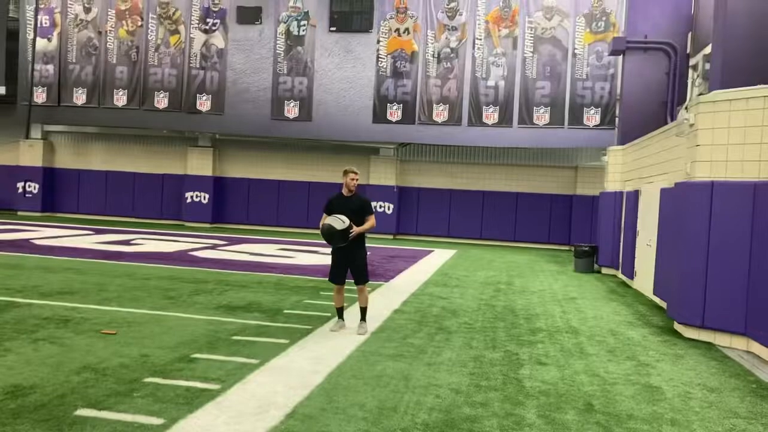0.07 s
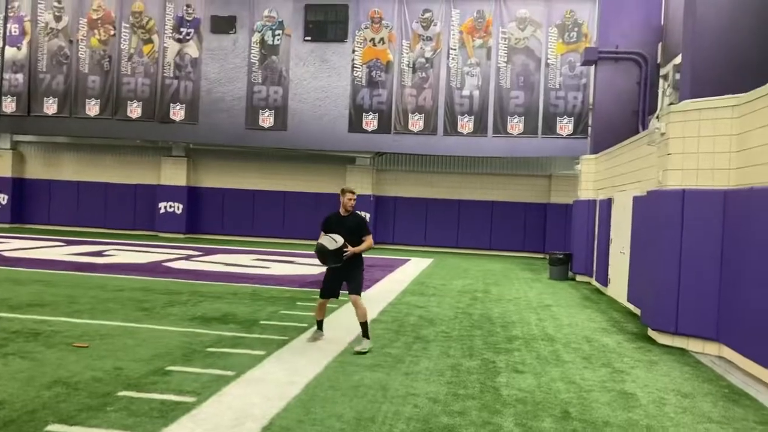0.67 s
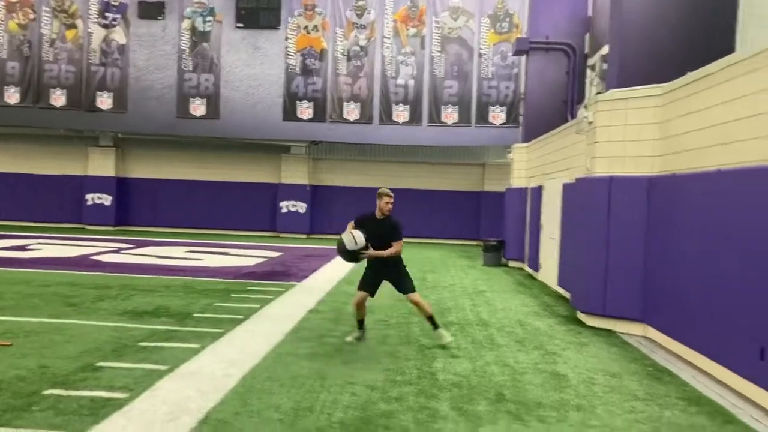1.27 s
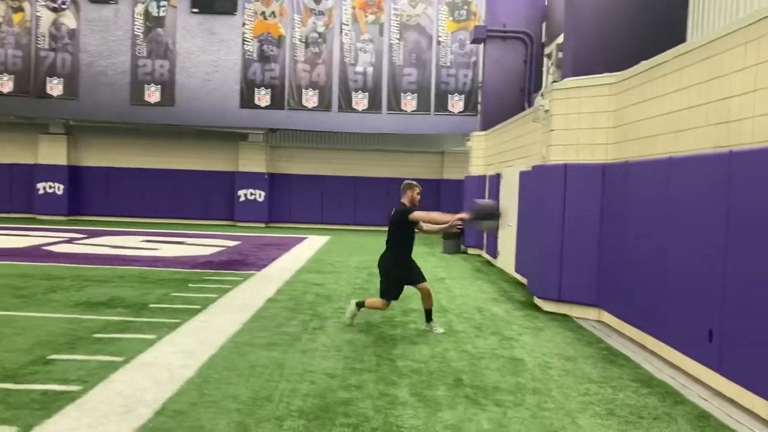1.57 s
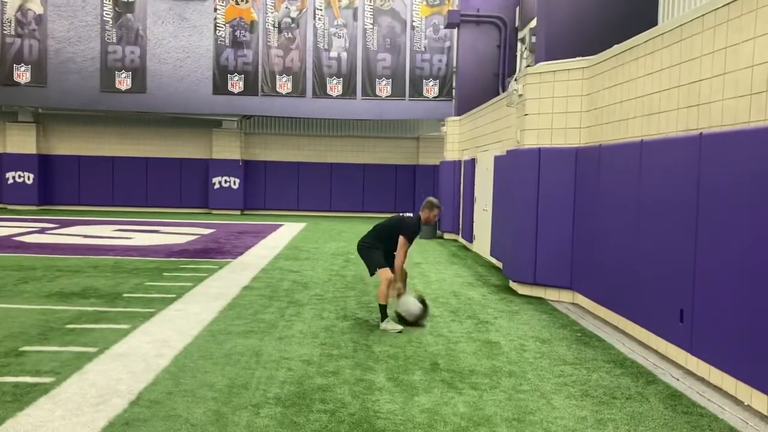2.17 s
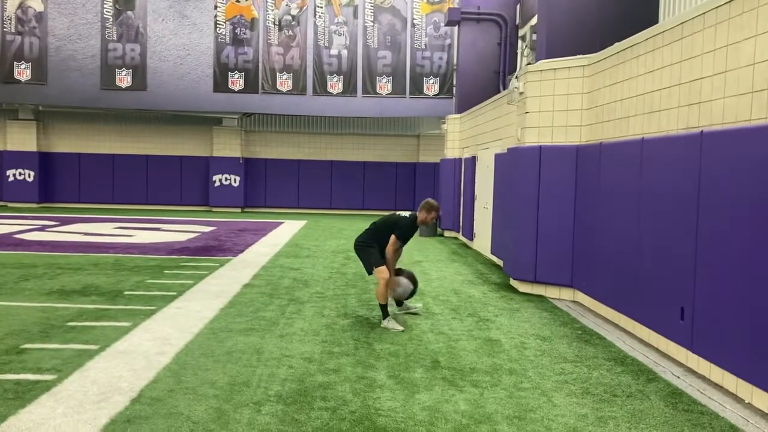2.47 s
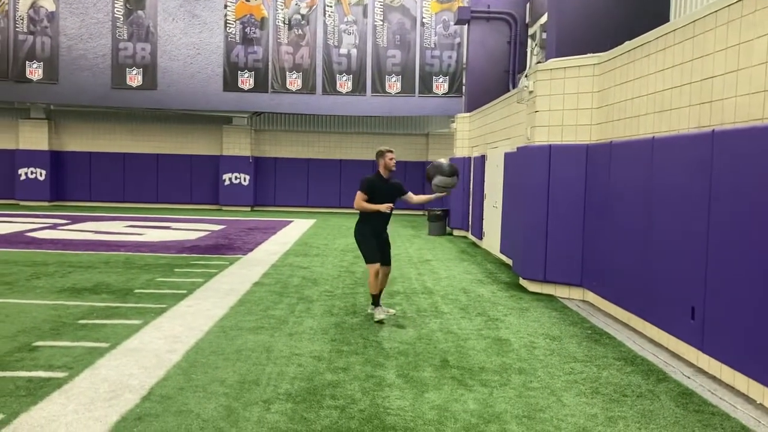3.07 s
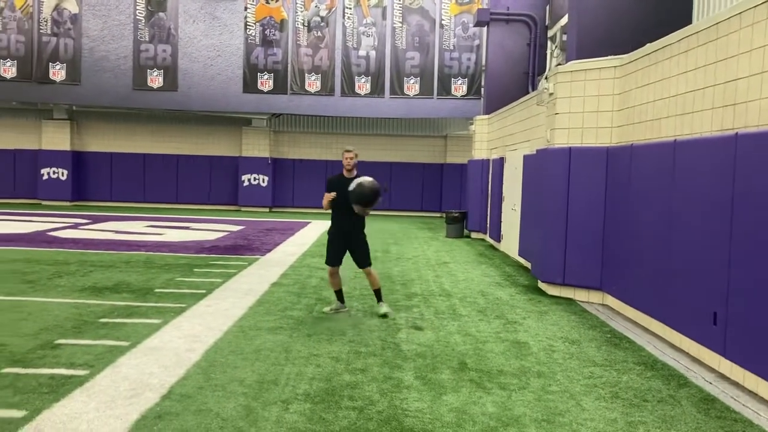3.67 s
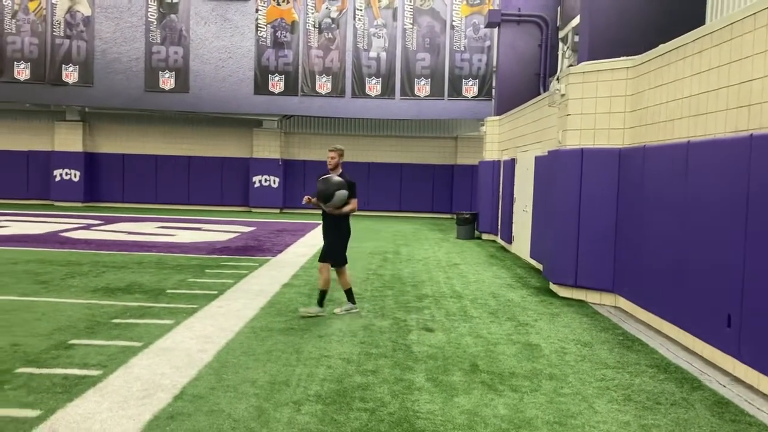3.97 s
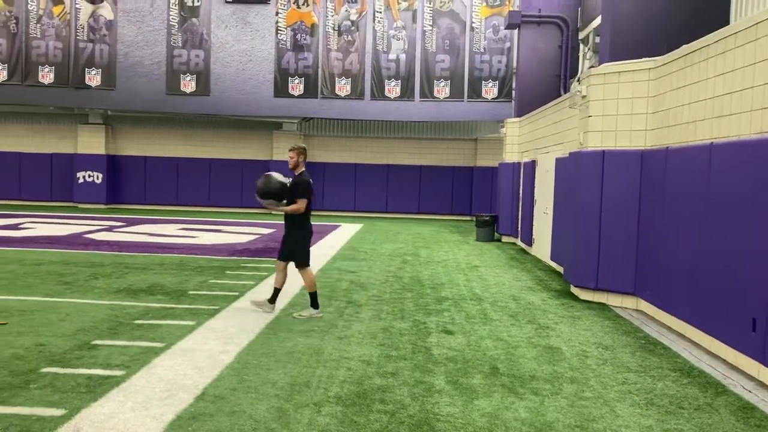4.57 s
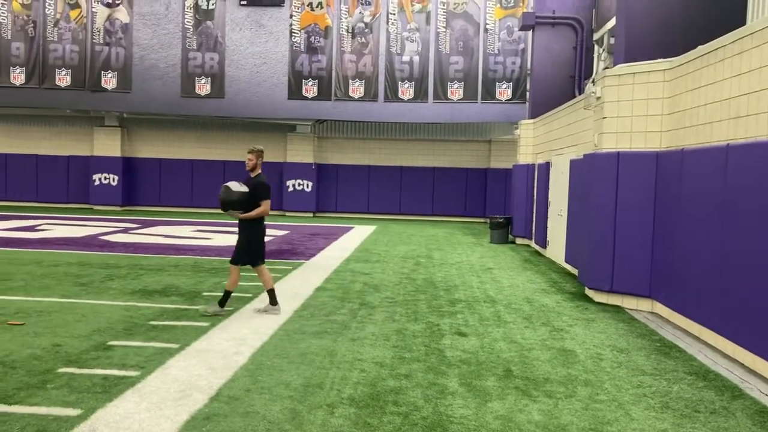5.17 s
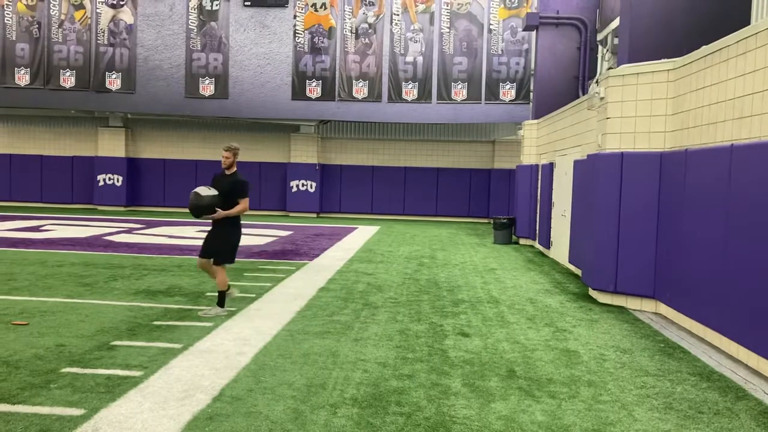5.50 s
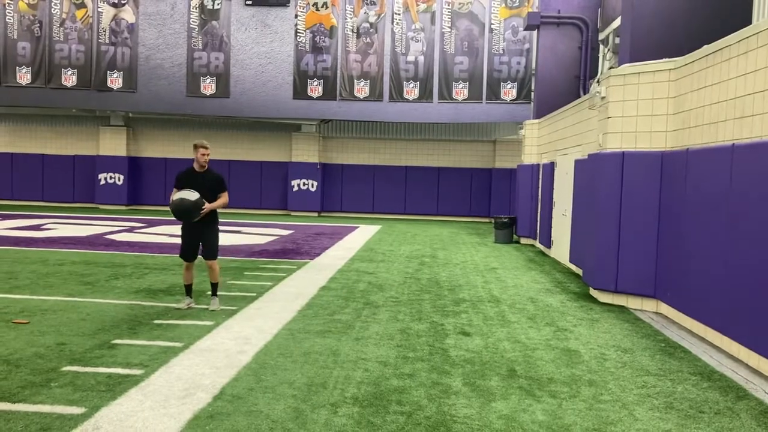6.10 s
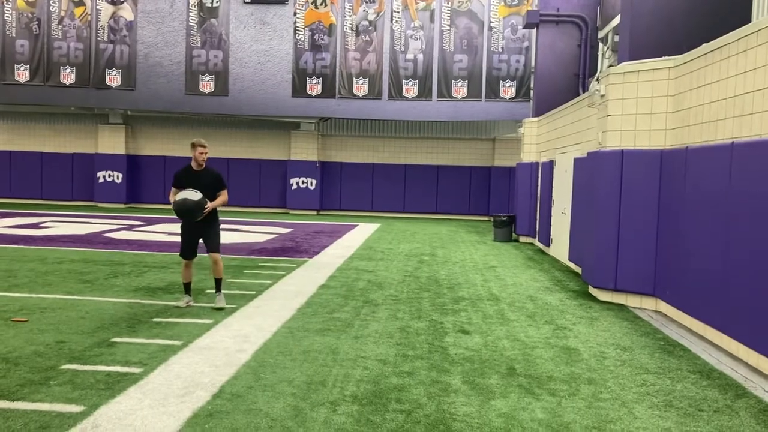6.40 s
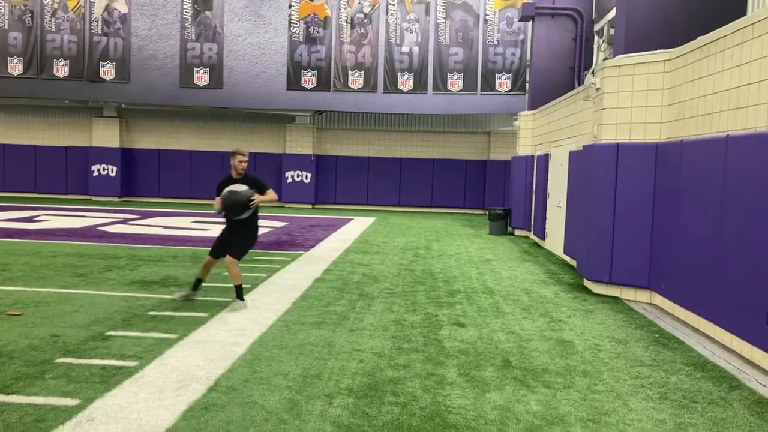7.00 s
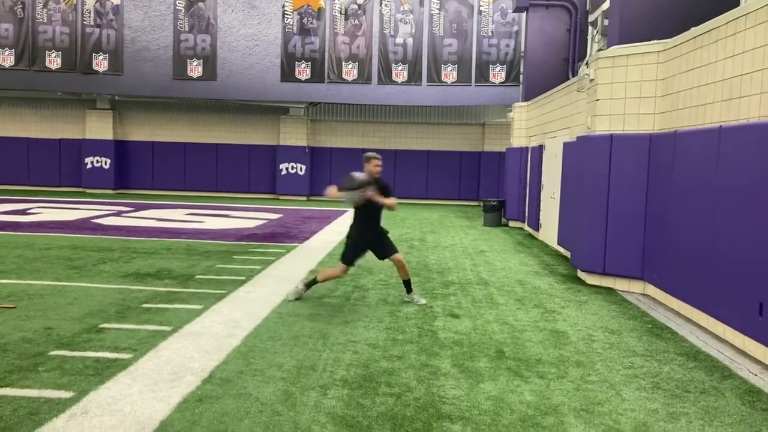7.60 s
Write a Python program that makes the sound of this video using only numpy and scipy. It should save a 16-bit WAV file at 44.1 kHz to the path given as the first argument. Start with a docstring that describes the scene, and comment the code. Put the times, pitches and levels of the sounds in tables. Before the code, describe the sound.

A heavy medicine ball slams into a padded wall in a large echoing hall, then drops onto turf, amid faint shoe scuffs and ventilation rumble.

```python
"""Medicine ball against a padded wall.

In a large hall with artificial turf, the ball's cover slaps, the board behind the pad thuds and
the cushion booms; walls and roof throw all three back. The ball drops, bounces once and is picked
up, squealing faintly in the hands. Shoes brush and stamp over the steady rumble of ventilation."""
import sys
import numpy as np
from scipy import signal
from scipy.fft import rfft, irfft, next_fast_len
from scipy.io import wavfile
from scipy.ndimage import uniform_filter1d

SR = 44100
rng = np.random.default_rng(int(sys.argv[2]) if len(sys.argv) > 2 else 0)


def wav_record(signal):
    """Record a signal, one row per channel, as 16-bit PCM in the file named by sys.argv[1]."""
    frames = np.transpose(np.atleast_2d(signal))
    bounded = np.clip(frames, -1, 1)
    # unit amplitude maps onto the largest positive 16-bit level
    quanta = np.round(bounded * 32767).astype(np.int16)
    wavfile.write(sys.argv[1], SR, quanta)


N = 346185
THROW_S = 1.7243  # ball meets wall
FFT_SIZE = 8192
BINS_HZ = np.fft.rfftfreq(FFT_SIZE, 1 / SR)


def amp(db):
    """Decibels to gain."""
    return 10 ** (np.asarray(db) / 20)


def unit_rms(x):
    """Scales to rms 1."""
    return x / np.sqrt(np.mean(x ** 2) + 1e-20)


def curve(rows, hz=BINS_HZ, column=1):
    """One table column, interpolated over log frequency."""
    columns = np.transpose(rows)
    return np.interp(np.log(hz + 1), np.log(columns[0] + 1), columns[column])


def bells(rows):
    """Bell-shaped lifts and dips, in dB per bin."""
    return sum(db * np.exp(-((BINS_HZ - hz) / width_hz) ** 2) for hz, width_hz, db in rows)


def colour(x, db):
    """Minimum-phase filter with the given gain per bin."""
    log_gain = np.log(amp(np.maximum(db, -100)))
    mirrored = np.concatenate([log_gain, log_gain[-2:0:-1]])
    response = np.exp(np.conj(signal.hilbert(mirrored)))[:len(BINS_HZ)]
    kernel = irfft(response)[:FFT_SIZE // 2].reshape((1,) * (x.ndim - 1) + (-1,))
    return signal.oaconvolve(x, kernel, axes=-1)[..., :x.shape[-1]]


def add(mix, start_s, sound):
    """Mixes a sound in at start_s."""
    part = mix[..., max(round(start_s * SR), 0):][..., :sound.shape[-1]]
    part += sound[..., :part.shape[-1]]


def from_side(x, lag_ms):
    """Off-centre sound reaches one microphone port late: the left for a positive lag."""
    size = next_fast_len(len(x) + FFT_SIZE)
    delay = np.exp(-2j * np.pi * np.fft.rfftfreq(size, 1 / SR) * abs(lag_ms) / 1000)
    late = irfft(rfft(x, size) * delay, size)[:len(x)]
    return np.array([late, x] if lag_ms > 0 else [x, late])


def burst(drive, spectrum_db, length_s):
    """Coloured burst with the energy of rms 1 held for length_s."""
    sound = colour(drive, spectrum_db)
    energy = np.sum(np.atleast_2d(sound) ** 2, 1).mean()
    return sound / np.sqrt(energy / (length_s * SR))


def rattle(envelope):
    """Dense tiny impacts under an envelope; near-flat spectrum, unit energy."""
    x = rng.standard_normal(len(envelope)) * envelope
    for _ in range(8):  # whiten, then restore the envelope
        x = irfft(np.exp(1j * np.angle(rfft(x))), len(x))
        x = x * envelope / np.sqrt(np.abs(uniform_filter1d(x ** 2, size=32)) + 1e-12)
    return x / np.linalg.norm(x)


# Diffuse field. Each row: frequency in Hz, left-right correlation.
COHERENCE = [(60, 0.98), (130, 0.9), (290, 0.83), (640, -0.011), (1400, -0.27), (3000, -0.042),
             (7000, -0.05), (15000, -0.034)]

def diffuse(size):
    """White noise from all sides: alike at both ports in the bass, unrelated in the treble."""
    length = next_fast_len(size)
    mid, side = rfft(rng.standard_normal((2, length)))
    coherence = np.clip(curve(COHERENCE, np.fft.rfftfreq(length, 1 / SR)), -1, 1)
    mid = mid * np.sqrt((1 + coherence) / 2)
    side = side * np.sqrt((1 - coherence) / 2)
    return irfft(np.array([mid + side, mid - side]), length)[:, :size]


# Air noise. Each row: frequency in Hz, relative density in dB.
AIR_SPECTRUM = [(20, -20), (30, -15), (52, 1.5), (120, -3), (200, -17), (450, -20.5), (750, -21.5),
                (1500, -26), (3000, -30.5), (5500, -38.5), (9000, -41), (11500, -52.5), (13500, -54.5),
                (16000, -59.5)]
# Duct resonances. Each row: centre in Hz, width in Hz, lift in dB.
DUCT_MODES = [(248.9, 16, 6.6), (345.2, 52, 4), (576.6, 24, 1.7)]

def ventilation(db):
    """Moving air rumbles and hisses through resonant ducts."""
    return amp(db) * unit_rms(colour(diffuse(N), curve(AIR_SPECTRUM) + bells(DUCT_MODES)))


def reverb_tail(bands, delay_s, rise_s, clump_db):
    """Reflections arrive in uneven clumps; each band dies at its own rate."""
    hz, t, noise = signal.stft(diffuse(2 * SR), SR, nperseg=512)
    t60_s = np.maximum(curve(bands, hz, column=2), .05)[:, None]
    gain = amp(curve(bands, hz))[:, None] * np.sqrt(np.log(1e6) / (t60_s * SR))
    clumps = unit_rms(uniform_filter1d(rng.standard_normal(noise.shape[1:]), size=24, axis=0))
    decay = np.exp(-np.log(1000) * t / t60_s)
    tail = signal.istft(noise * unit_rms(amp(clump_db * clumps)) * gain * decay, SR, nperseg=512)[1]
    tail *= 1 - np.exp(-np.arange(tail.shape[1]) / SR / rise_s)
    return np.pad(tail, ((0, 0), (round(delay_s * SR), 0)))


# Early and late reverberation. Each row: frequency in Hz, gain in dB, T60 in seconds.
EARLY_BANDS = [(60, -24, .8), (149, -12.5, .45), (400, -7, .2), (1200, -7.5, .62), (3500, -5.5, .85),
               (7000, -18, 0.29), (11000, -11, 0.81), (16000, -20.5, .35)]
LATE_BANDS = [(60, -10.5, 2.8), (150, -21, 1.91), (400, -15.5, 2.3), (1200, -14, 3.4), (2920, -10.5, 4.2),
              (7000, -18, 2.5), (11000, -30.5, .9), (16000, -36, .65)]

def hall(x):
    """The near wall and roof answer first, then the whole hall rings."""
    response = np.zeros((2, 2 * SR))
    add(response, 0, reverb_tail(EARLY_BANDS, delay_s=.038, rise_s=.004, clump_db=4))
    add(response, 0, reverb_tail(LATE_BANDS, delay_s=.015, rise_s=.06, clump_db=2))
    return signal.fftconvolve(x[None], response, axes=1)[:, :N]


def click(start_s, db, fall_s):
    """One faint, sharp click: a step that sinks back."""
    out = np.zeros(N)
    add(out, start_s, -amp(db) * np.exp(-np.arange(SR // 50) / SR / fall_s))
    return out


# Dry ticks. Each row: start in seconds, level in dB.
TURF_TICKS = [(3.4616, -51), (4.569, -49), (5.3403, -52), (7.038, -53.5), (7.711, -50)]
# Their spectrum. Each row: frequency in Hz, relative density in dB.
TICK_SPECTRUM = [(300, -4), (1200, 4), (4000, -8), (8000, 5), (15000, -10)]

def ticks(fall_s=.0012):
    """Tiny snaps of turf and shoe."""
    out, t = np.zeros((2, N)), np.arange(SR // 40) / SR
    for start_s, db in TURF_TICKS:
        snap = diffuse(len(t)) * np.exp(-t / fall_s)
        add(out, start_s, amp(db) * burst(snap, curve(TICK_SPECTRUM), fall_s))
    return out


def sole_pressure(t, rise_s, fall_s):
    """The load on a sole builds to 1 at t = 0, then eases."""
    return 1 / np.cosh(np.clip(t / np.where(t < 0, rise_s, fall_s), -20, 20))


def add_stroke(envelopes, peak_s, db, rise_s, fall_s, rasp_db):
    """Adds one shoe stroke to the brush and rasp envelopes; the rasp needs more pressure."""
    pressure = sole_pressure(np.arange(-SR // 2, SR // 2) / SR, rise_s, fall_s)
    add(envelopes, peak_s - .5, amp(db) * np.array([pressure, amp(rasp_db) * pressure ** 2.6]))


# Run-ups. Each row: skip time, slide length and pivot time in seconds, effort in dB.
RUN_UPS = [(.966, .085, 1.505, 0), (7.051, 0.049, 7.636, 1.5)]
# Light steps. Each row: peak time in seconds, brush level in dB, half length in seconds.
LIGHT_STEPS = [(1.24, -76, 0.013), (1.58, -60.5, 0.016), (1.668, -61, .008), (3.142, -70, 0.015),
               (3.464, -66.5, .018), (4.58, -67.5, .035), (4.83, -74.5, 0.039), (5.147, -73.5, 0.049),
               (5.66, -73, .05), (6.024, -73, .025), (7.261, -67, 0.016)]

def footwork(drag_after_s=.17, lift_s=2.72):
    """Brush and rasp envelopes: skips, pivots, toe drags, steps and a shift as the ball is lifted."""
    envelopes = np.zeros((2, N))
    for skip_s, slide_s, pivot_s, effort_db in RUN_UPS:
        add_stroke(envelopes, skip_s, db=effort_db - 56.5, rise_s=.02, fall_s=slide_s, rasp_db=2)
        add_stroke(envelopes, pivot_s, db=effort_db - 56.5, rise_s=.036, fall_s=.016, rasp_db=10)
        add_stroke(envelopes, pivot_s + drag_after_s, db=-64, rise_s=.034, fall_s=.06, rasp_db=3.5)
    for peak_s, db, half_s in LIGHT_STEPS:  # quick bite, slow slide out
        add_stroke(envelopes, peak_s, db, rise_s=.65 * half_s, fall_s=1.25 * half_s, rasp_db=4)
    add_stroke(envelopes, lift_s, db=-72, rise_s=.12, fall_s=.34, rasp_db=16)
    return envelopes


# Turf blades and rubber crumb. Each row: frequency in Hz, relative density in dB.
BLADE_SPECTRUM = [(300, -31), (1500, -7), (4200, -6.5), (5800, -4), (7300, 3), (11000, 2), (15500, -7)]
CRUMB_SPECTRUM = [(100, -27), (350, -3.5), (750, -5), (1050, -1), (1400, 4.5), (1950, -8.5), (2400, -8),
                  (3000, -14), (4500, -21), (9000, -33.5)]

def scuffs(flicks_per_s=12000):
    """Plastic blades flick past the sole; under weight the rubber crumb rasps too."""
    brush, rasp = footwork()
    strengths = amp(1.8 * np.minimum(rng.exponential(1, N), 5))
    flicks = strengths * (rng.random(N) < flicks_per_s / SR)
    blades = unit_rms(colour(diffuse(N) * flicks, curve(BLADE_SPECTRUM)))
    crumb = unit_rms(colour(diffuse(N), curve(CRUMB_SPECTRUM)))
    return brush * blades + rasp * crumb


def add_knock(mix, centre_s, db, width_s):
    """Adds one dull push with no ring."""
    lead_s = .01
    u = (np.arange(SR // 50) / SR - lead_s) / width_s
    add(mix, centre_s - lead_s, amp(db) * (2 * u ** 2 - 1) * np.exp(-u ** 2))


def boom(db, start_hz, length_s, sag_s=.14, rise_s=.009):
    """A cushion swings a few times; its pitch sags as more mass joins in."""
    t = np.arange(SR // 5) / SR
    cycles = start_hz * sag_s * (1 - np.exp(-t / sag_s))
    envelope = (1 - np.exp(-(t / rise_s) ** 2)) * np.exp(-(t / length_s) ** 3)
    return amp(db) * np.sqrt(2) * np.sin(2 * np.pi * cycles) * envelope


# Foot plants. Each row: heel time in seconds, crunch level in dB, rise and fall in seconds,
# sole time in seconds, sole level in dB.
FOOT_PLANTS = [(1.607, -43.5, .024, .009, 1.612, -46), (7.7157, -42.5, 0.0033, 0.016, 7.746, -39.5)]
# Heel crunch. Each row: frequency in Hz, relative density in dB.
HEEL_SPECTRUM = [(60, -12.5), (190, 5.5), (320, -2.5), (480, -.5), (680, -6.5), (1100, -12.5),
                 (2000, -24.5), (6000, -38.5)]

def stamps():
    """The front heel crunches and knocks into the turf, then the sole thumps down."""
    out, t = np.zeros((2, N)), np.arange(-SR // 4, SR // 4) / SR
    for heel_s, db, rise_s, fall_s, sole_s, sole_db in FOOT_PLANTS:
        crunch = unit_rms(colour(diffuse(len(t)), curve(HEEL_SPECTRUM)))
        add(out, heel_s + t[0], amp(db) * sole_pressure(t, rise_s, fall_s) * crunch)
        add_knock(out, heel_s, db + 6, width_s=.0013)
        add(out, sole_s, boom(sole_db, start_hz=85, length_s=.043))
    return out


# Ball cover. Each row: frequency in Hz, relative density in dB.
SLAP_SPECTRUM = [(150, -34), (400, -25), (620, -19), (800, -7.5), (1080, -7.5), (1650, -7), (2100, -11),
                 (3300, -13.5), (4300, -11), (5500, -10), (7500, -8.5), (11000, -15.5), (15500, -20)]

def slap(db, contact_s, spread):
    """The cover flattens in a few quick snaps, ever wider apart; the filling hisses as it settles."""
    t = np.arange(SR // 5) / SR
    snap_phase = (t / (.17 * contact_s)) ** .85 % 1
    contact = np.exp(-(t / contact_s) ** 4) * (.3 + np.exp(-snap_phase / .4))
    low_cut_db = -10 * np.log10(1 + (900 / (BINS_HZ + 1)) ** 2)
    scattered = colour(np.array([rattle(contact), rattle(contact)]), low_cut_db)
    hiss = .27 * rattle(np.exp(-t / .04))
    direct = from_side(rattle(contact) + hiss, lag_ms=.09)
    return amp(db) * burst(direct + spread * scattered, curve(SLAP_SPECTRUM), contact_s)


# Body of an impact. Each row: frequency in Hz, relative density in dB.
THUD_SPECTRUM = [(25, -45), (100, -9), (160, 9.5), (230, 4), (300, -4), (400, -1.5), (600, -4),
                 (900, -12.5), (1400, -27.5), (3000, -50)]

def thud(db, travel_s):
    """Low bending waves travel slowest (travel_s at 400 Hz), so the thud falls in pitch."""
    lag_cycles = 2 * travel_s * np.sqrt(400 * np.fft.rfftfreq(SR // 5, 1 / SR))
    chirp = irfft(np.exp(-2j * np.pi * lag_cycles), SR // 5)
    return amp(db) * burst(chirp, curve(THUD_SPECTRUM), length_s=.014)


# Slips. Each row: start and length in seconds, start and end pitch in Hz, level in dB before gain_db.
COVER_SLIPS = [(2.625, .13, 1490, 1502, -62), (2.68, .2, 1684, 1622, -63), (2.77, 0.1, 1490, 1430, -59.5),
               (2.86, 0.15, 1600, 1584, -62), (2.989, 0.1, 1600, 1627, -61),
               (3.203, .075, 1535, 1535, -61.5), (3.287, .085, 1660, 1610, -66.5)]

def squeals(gain_db, waver_hz=42):
    """The cover squeals faintly as it slips through the hands."""
    out = np.zeros((2, N))
    for start_s, length_s, start_hz, end_hz, db in COVER_SLIPS:
        progress = np.arange(0, 1, 1 / (length_s * SR))
        waver = unit_rms(uniform_filter1d(rng.standard_normal(SR // 2), size=300))[:len(progress)]
        pitch_hz = start_hz + (end_hz - start_hz) * progress + waver_hz * waver
        tone = np.sqrt(2) * np.sin(2 * np.pi * np.cumsum(pitch_hz) / SR)
        add(out, start_s, from_side(amp(db + gain_db) * np.sin(np.pi * progress) * tone, lag_ms=.095))
    return out


# Grips and catches. Each row: start in seconds, gain in dB.
PALM_PATS = [(2.655, -60), (2.695, -55.5), (2.8, -57), (3.145, -60), (3.232, -56.5)]

def pats():
    """The palms catch the ball with a hollow pat."""
    out = np.zeros((2, N))
    hollow_db = bells([(1040, 670, 19.3)])
    for start_s, gain_db in PALM_PATS:
        pat = slap(db=-12.5, contact_s=.018, spread=1.3) + thud(db=-8, travel_s=.00297)
        add(out, start_s, amp(gain_db) * colour(pat, hollow_db))
    return out


# Drop and bounce. Each row: start in seconds, slap level in dB before the mid lift,
# contact in seconds, boom level in dB, boom start pitch in Hz.
BALL_LANDINGS = [(2.153, -41.5, .018, -25.5, 44), (2.257, -39, .011, -37.5, 117)]
# Filling slumps. Each row: centre in seconds, level in dB, width in seconds.
FILLING_KNOCKS = [(2.1597, -20, .0014), (2.165, -27, 0.0008), (2.1811, -23.5, 0.0022),
                  (2.1837, -23.5, 0.0011), (2.263, -25.5, 0.0014), (2.269, -26.5, 0.00217),
                  (2.286, -28.5, 0.0022)]
# Filling settles. Each row: start in seconds, level in dB, swell in seconds.
FILLING_CRUNCHES = [(2.172, -42.5, .009), (2.268, -45, .005)]
# Its crunch. Each row: frequency in Hz, relative density in dB.
FILLING_SPECTRUM = [(80, -8), (200, 3), (500, -2.5), (1000, -6), (1500, -12), (3000, -24), (8000, -25)]

def ball_drop():
    """The cover lands on the turf; the loose filling follows in dull knocks and crunches to rest."""
    out, t = np.zeros((2, N)), np.arange(SR // 5) / SR
    mid_lift_db = bells([(700, 530, 5.3)])
    for start_s, slap_db, contact_s, boom_db, boom_hz in BALL_LANDINGS:
        cover = colour(slap(slap_db, contact_s, spread=.95), mid_lift_db)
        add(out, start_s, cover - boom(boom_db, boom_hz, length_s=.048))
    for centre_s, db, width_s in FILLING_KNOCKS:
        add_knock(out, centre_s, db, width_s)
    for start_s, db, swell_s in FILLING_CRUNCHES:
        grains = diffuse(len(t)) * t / swell_s * np.exp(-t / swell_s)
        add(out, start_s, amp(db) * burst(grains, curve(FILLING_SPECTRUM), 3 * swell_s))
    return out


# Thud off the floor and near walls; boom off the roof and far walls.
# Each row: delay in seconds, gain in dB.
NEAR_RETURNS = [(.0155, -10), (.033, -17), (.047, -17.5), (.062, -17), (.081, -17.5), (.128, -23.5),
                (.151, -25), (.181, -27)]
FAR_RETURNS = [(0.095, -16), (0.125, -14.2), (0.1378, -21), (0.1764, -22), (.215, -25), (0.2506, -29),
               (.317, -18), (.3451, -12.5), (.3909, -23.5), (.4748, -21.5), (.5293, -24.8), (0.5853, -22.5),
               (.62, -26.5), (.7252, -27.6), (.7546, -27.5), (.834, -28.5)]

def low_echoes(direct, hit):
    """Near surfaces return the thud in quick succession; far ones keep the boom rolling."""
    out = np.zeros(N)
    body = signal.sosfilt(signal.butter(2, [115, 620], "band", fs=SR, output="sos"), direct)
    bass = signal.sosfilt(signal.butter(2, 95, fs=SR, output="sos"), hit)
    for band, returns in [(body, NEAR_RETURNS), (bass, FAR_RETURNS)]:
        for delay_s, db in returns:
            add(out, THROW_S + delay_s, amp(db) * band)
    return out


def smeared_band(hit, centre_hz, width_octaves, smear_s):
    """One band of the hit, steeper on its treble side, smeared by scattering."""
    widths = np.log2((BINS_HZ + 1) / centre_hz) / width_octaves
    loss_db = np.minimum(np.where(widths < 0, 6, 26) * widths ** 2, 45)
    t = np.arange(SR // 5) / SR
    return signal.fftconvolve(colour(hit, -loss_db), rattle(np.exp(-t / smear_s)))


# Hard surfaces. Each row: delay in seconds, gain in dB, smear in seconds, left-right lag in ms,
# band centre in Hz, width in octaves.
HARD_RETURNS = [(.047, -23, .003, .15, 8000, 1), (.073, -21, 0.00301, -.2, 3500, 1.5),
                (.119, -21.5, 0.0042, .1, 7500, 1.1), (.167, -21.5, 0.0046, -.1, 2290, 1.2),
                (.306, -11.5, 0.0054, -.43, 3900, 0.97), (.352, -24, .006, .1, 4600, 0.78),
                (.373, -26, 0.0062, 0, 4750, 0.84), (.472, -26, .008, 0, 4600, .9),
                (.65, -29, .014, .2, 2200, 1.6), (.67, -26.5, 0.013, -.2, 3600, 1.26),
                (.775, -44, .006, 0, 5160, 1)]

def slap_echoes(hit):
    """Each hard surface returns a band of the slap; girders beside it scatter a darker wash."""
    out = np.zeros((2, N))
    for delay_s, db, smear_s, lag_ms, hz, width_octaves in HARD_RETURNS:
        echo = amp(db) * smeared_band(hit, hz, width_octaves, smear_s)
        wash = amp(db - 3.5) * smeared_band(hit, .71 * hz, width_octaves, smear_s=.055)
        add(out, THROW_S + delay_s, from_side(echo, lag_ms))
        add(out, THROW_S + delay_s + .015, from_side(wash, lag_ms))
    return out


def wall_hit():
    """The ball meets the pad: the cover slaps, the board thuds, the cushion booms."""
    hit = slap(db=-13.5, contact_s=.0098, spread=.46) + thud(db=-16, travel_s=.005)
    add(hit, .002, boom(db=-8.5, start_hz=75, length_s=.05))
    return hit


# Resonances of ball and pad. Each row: centre in Hz, width in Hz, gain in dB.
PAD_MODES = [(127, 10, 7), (345, 22, 4.5), (408, 30, 6.5), (595.5, 75, 5), (730, 25, -3), (825, 55, 6),
             (1120, 35, -6), (1214, 35, 4), (1378, 80, 8.5), (1580, 60, 4), (2210, 190, -10),
             (2615, 80, 4.5), (2830, 110, -6), (3985, 90, 8), (4290, 110, 4.5), (5200, 130, -10.5),
             (5650, 160, 4), (7030, 170, 6.5), (7500, 200, 4.5)]
# Direct-path balance. Each row: frequency in Hz, left minus right in dB.
DIRECT_BALANCE = [(60, -.5), (700, -.5), (1290, 2.5), (2380, 1), (4400, 0.5), (8000, 1), (15000, -1)]

def throw(hall_colour_share=.23):
    """The wall hit arrives directly, then as reverberation and echoes with less of the pad's colour."""
    hit, out = wall_hit(), np.zeros((2, N))
    pad_db, tilt_db = bells(PAD_MODES), curve(DIRECT_BALANCE) / 2
    outward_db = hall_colour_share * pad_db
    direct = np.array([colour(hit[0], pad_db + tilt_db), colour(hit[1], pad_db - tilt_db)])
    add(out, THROW_S, direct)
    for _ in range(2):  # each end of the hall gets its own crackle
        add(out, THROW_S, hall(colour(wall_hit()[0], outward_db)) / np.sqrt(2))
    return out + low_echoes(direct[0], hit[0]) + slap_echoes(colour(hit[0], outward_db))


def scene():
    """One throw, the ball handling and the footwork in the ventilated hall."""
    wall = throw()
    floor = ball_drop() + stamps() + scuffs() + ticks() + squeals(gain_db=-1) + pats()
    floor_reverb = amp(-2) * hall(floor[0])
    background = click(start_s=5.4232, db=-39, fall_s=.0015) + ventilation(db=-50)
    return wall + floor + floor_reverb + background


# Cancellations in the sum and difference of the two microphone ports.
# Each row: centre in Hz, width in Hz, gain in dB.
MID_NOTCHES = [(5870, 500, -3.5), (9085, 660, -32), (13500, 830, -23)]
SIDE_NOTCHES = [(6900, 520, -32.5), (11500, 640, -22), (16000, 870, -14)]

def record(dry):
    """Port colour, soft peak ceiling, switch-on and band limit."""
    ceiling, switch_on_s, cutoff_hz = .85, .072, 15900
    mid = colour((dry[0] + dry[1]) / 2, bells(MID_NOTCHES))
    side = colour((dry[0] - dry[1]) / 2, bells(SIDE_NOTCHES))
    sound = np.array([mid + side, mid - side])
    sound /= (1 + (np.abs(sound) / ceiling) ** 6) ** (1 / 6)
    sound *= np.arange(N) / SR >= switch_on_s
    lowpass = signal.firwin(511, cutoff_hz, window=("kaiser", 9), fs=SR)
    return signal.oaconvolve(sound, lowpass[None], "same")


dry = scene()
out = record(dry)
wav_record(out)
```